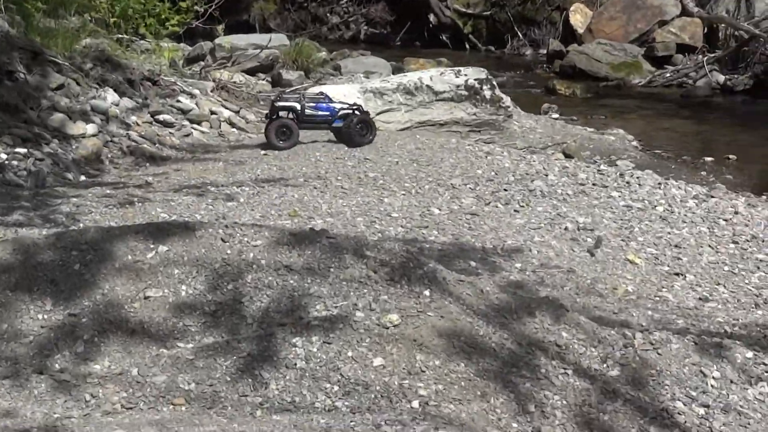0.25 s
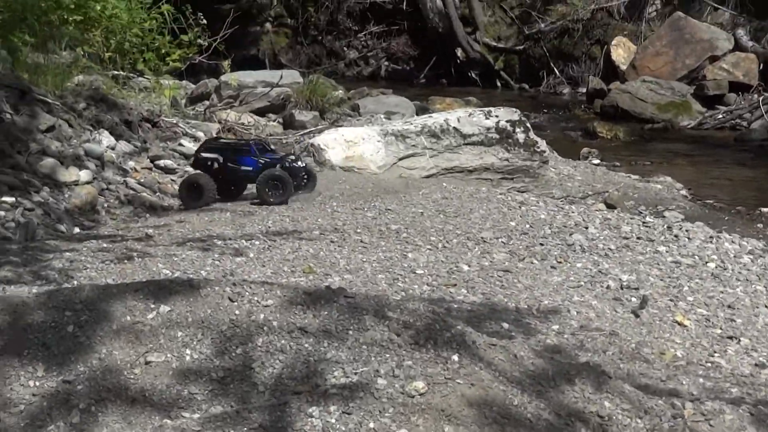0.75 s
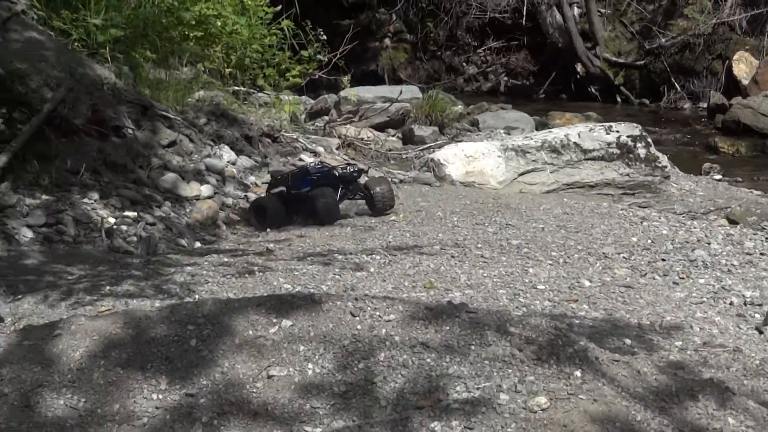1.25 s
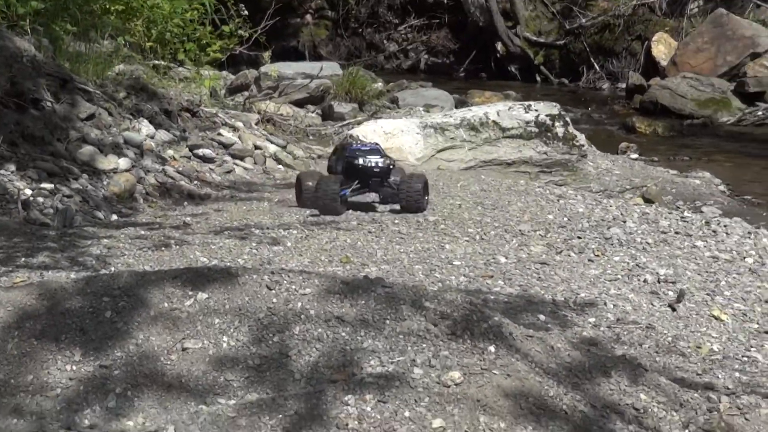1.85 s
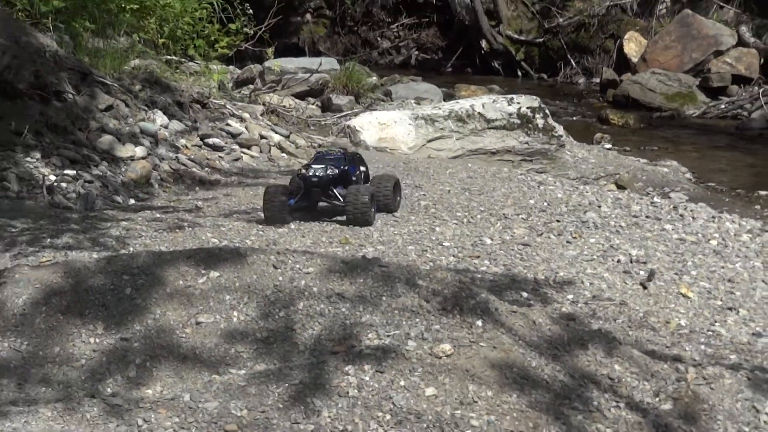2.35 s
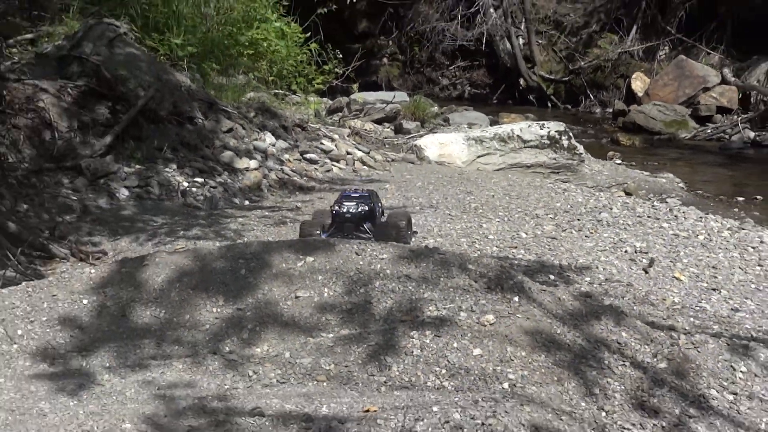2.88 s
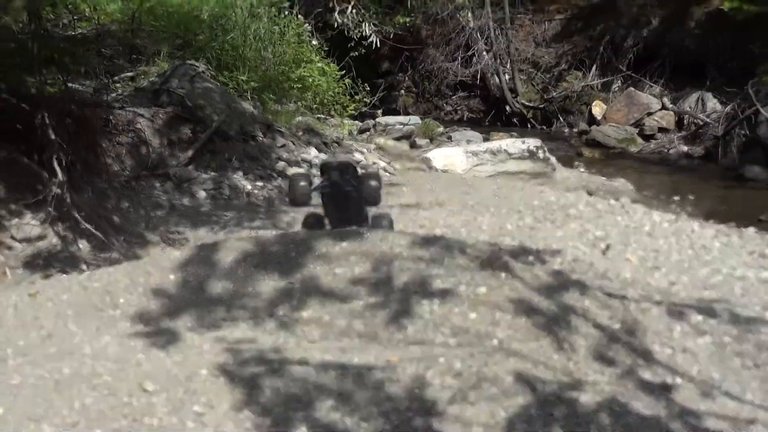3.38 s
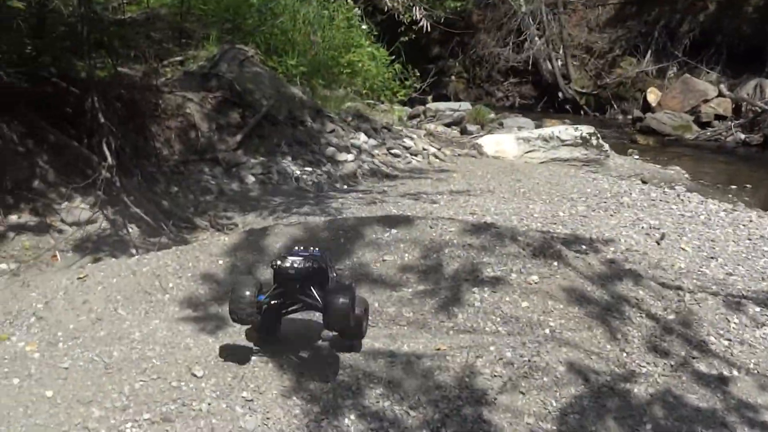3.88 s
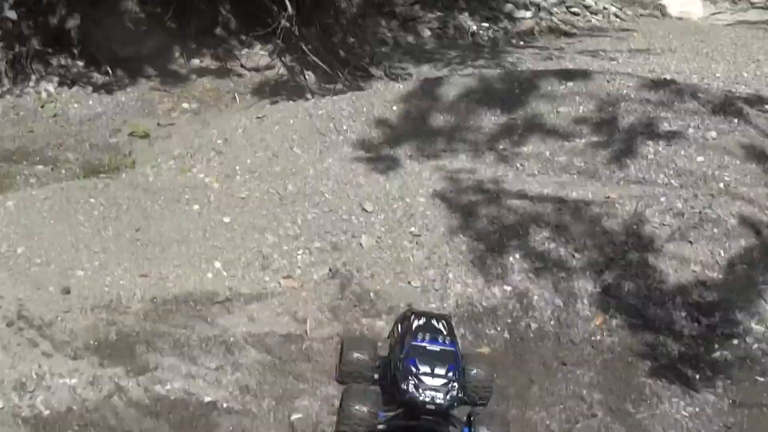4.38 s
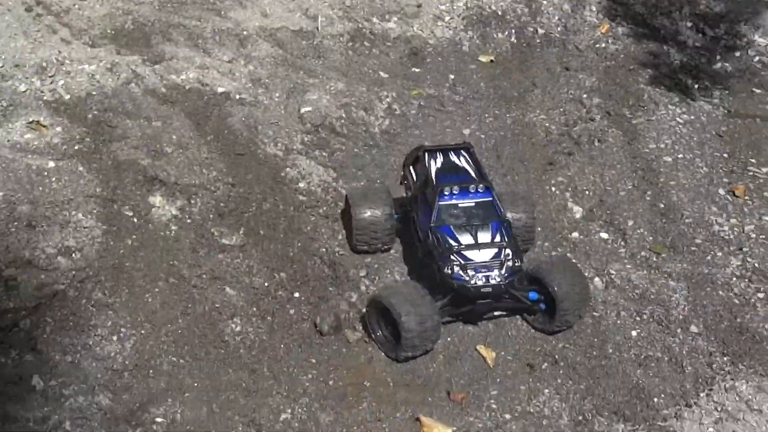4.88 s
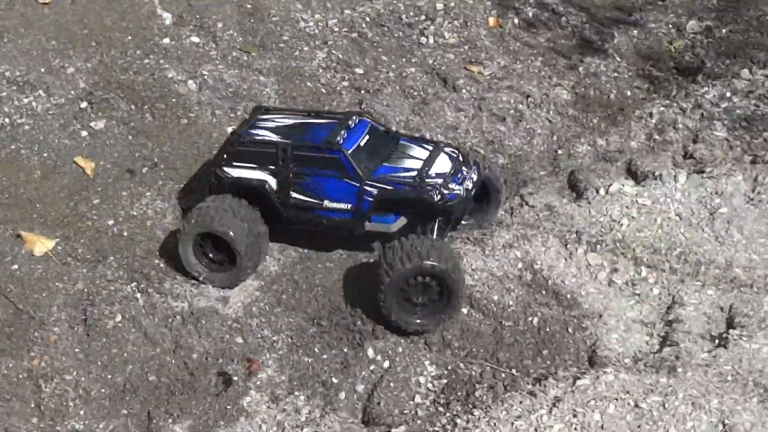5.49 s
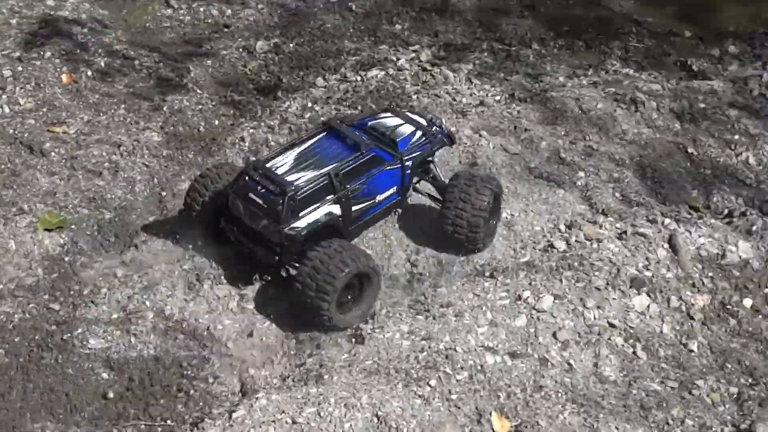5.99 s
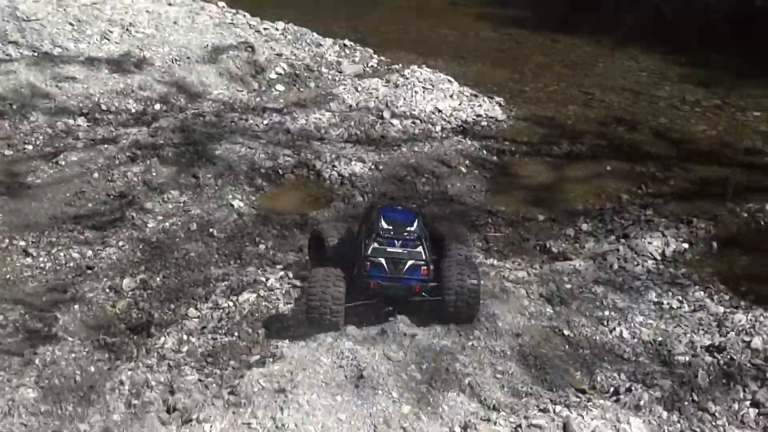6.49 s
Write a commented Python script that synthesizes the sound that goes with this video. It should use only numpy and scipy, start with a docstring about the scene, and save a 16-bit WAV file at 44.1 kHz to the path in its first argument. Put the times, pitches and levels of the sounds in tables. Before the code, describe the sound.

A creek ripples softly throughout on an open gravel bank. From 0 to 0.4 seconds a distant toy truck is barely heard, with a light thump. Around 0.45 to 0.7 its electric gear whine jumps up and stones scrub under spinning tyres; it drops back, then surges again at 1.2 to 1.5. From 1.9 to 3.2 it approaches with a rough, wavering whine, faint squeaks and light gravel crunch; a thin bird note sounds near 2.7. At 3.3 gears screech sharply, gravel bursts and a hollow thump follows at 3.45. During the jump low tyre rumble drops while small metal parts jingle. It lands around 3.97 to 4.2 with thumps and bright stone cracks. Close by, it whines and crunches, clattering at 5.05. From 5.2 bursts of howl and short screeches lead into a climbing, ragged whine over loud gravel, with a thin steady motor tone, until about 6.7.

```python
"""On a gravel bank by a creek, a radio-controlled truck crosses, jumps a mound, lands close by and speeds away.
Rough gears whine, howl and ring the drivetrain; the speed controller adds a thin, nearly steady tone.
Random contacts, coloured by tyres, gravel and plastic, make the crunch, rumble, clatter and flung stones.
Joints squeak and landings thump; the creek runs on and a bird calls faintly."""
import sys
import numpy as np
from scipy import signal
from scipy.fft import rfft, irfft, next_fast_len
from scipy.io import wavfile
from scipy.ndimage import uniform_filter1d, map_coordinates

SR = 44100
rng = np.random.default_rng(int(sys.argv[2]) if len(sys.argv) > 2 else 0)


def output_pcm(signal):
    """Save a mono or channel-first signal as 16-bit PCM at the path in sys.argv[1].

    Samples are clipped to [-1, 1] before scaling.
    """
    pcm = np.clip(np.atleast_2d(signal).T, -1, 1) * 32767
    wavfile.write(sys.argv[1], SR, np.round(pcm).astype(np.int16))


N = 297234


def amp(db):
    """Decibels to gain."""
    return 10 ** (np.asarray(db) / 20)


def unit(x):
    """x at rms 1."""
    return x / np.sqrt(np.mean(x ** 2) + 1e-20)


def curves(rows):
    """One value per sample for each column after the time."""
    s, *cols = np.transpose(rows)
    return [np.interp(np.arange(N) / SR, s, c) for c in cols]


def wobble(rate):
    """A smooth random curve of rms 1, rate knots a second."""
    knots = rng.standard_normal(int(N * rate / SR) + 4)
    return unit(map_coordinates(knots, [np.arange(N) * rate / SR]))


def turning(hz):
    """Phase of a changing frequency."""
    return 2 * np.pi * np.cumsum(hz) / SR


def filtered(x, response):
    """x times a complex response of frequency."""
    m = next_fast_len(N + SR // 2)
    return irfft(rfft(x, m) * response(np.fft.rfftfreq(m, 1 / SR)), m)[..., :N]


def coloured(x, points):
    """x through a spectrum of (Hz, dB) points."""
    f, db = np.transpose(points)
    return filtered(x, lambda hz: amp(np.interp(np.log(hz + 1), np.log(f), db)))


def resonant(x, modes):
    """x through (Hz, width Hz, dB) resonances."""
    def response(f):
        return sum(amp(db) * 1j * f * w / (c * c - f * f + 1j * f * w) for c, w, db in modes)
    return filtered(x, response)


def grains(rate, spread_db):
    """Tiny contacts at random moments; a positive spread makes a few much harder than the rest."""
    size = amp(spread_db * np.minimum(rng.standard_exponential(N), 4))
    return unit((rng.random(N) < rate / SR) * size * rng.standard_normal(N))


def pebbles(rate, low_hz, high_hz, cycles, spread_db):
    """Each flung pebble pings briefly at its own pitch."""
    count = int(rate * N / SR)
    when, pitch, hardness = rng.random((count, 3)).T[:, :, None]
    hz = low_hz + (high_hz - low_hz) * pitch
    k = np.arange(SR // 40)
    pings = amp(spread_db * hardness) * np.sin(2 * np.pi * hz * k / SR) * np.exp(-hz * k / SR / cycles)
    return unit(np.bincount(((when * N).astype(int) + k).ravel(), pings.ravel(), N)[:N])


def ring(blows, hz, width_hz, order=3):
    """A resonance with steep skirts, fixed or moving, at rms 1."""
    carrier = np.exp(1j * turning(hz * np.ones(N)))
    sos = signal.butter(order, width_hz / 2, fs=SR, output="sos")
    return unit((signal.sosfilt(sos, blows / carrier) * carrier).real)


def flutter(phase, shaft, depth):
    """A gear tone; an off-centre shaft and loose teeth split it into wandering side tones."""
    sides = sum(wobble(40) * np.sin(phase + k * shaft) / abs(k) for k in (-1.5, -0.5, 1.26, 6.5))
    return unit(np.sin(phase) + depth * sides)


def panels(x, t60):
    """The body's many close modes ring on after a tone; its slow level changes are evened out."""
    t = np.arange(SR // 12) / SR
    modes = rng.standard_normal(len(t)) * amp(-60 * t / t60)
    rung = signal.fftconvolve(x, modes)[:N]
    return rung / np.sqrt(np.abs(uniform_filter1d(rung ** 2, size=4000)) + 1e-9)


def add(track, s, sound):
    """Mix a sound into the track at time s."""
    part = track[max(round(s * SR), 0):][:len(sound)]
    part += sound[:len(part)]


def swell(s, length, rise_s, fall_s):
    """0 to 1 and back: rise from s, hold until s + length, fall."""
    t = np.arange(N) / SR - s
    return np.clip(np.minimum(t / rise_s, 1 - (t - length) / fall_s), 0, 1)


def swells(rows, rise_s, fall_s):
    """Events (s, length, amounts..) summed into one control for each amount."""
    return sum(np.outer(amounts, swell(s, length, rise_s, fall_s)) for s, length, *amounts in rows)


def air():
    """Faint moving air rumbles separately on each channel."""
    spectrum = [(25, -5), (60, -3), (150, -12), (600, -40)]
    return amp(-83) * unit(coloured(rng.standard_normal((2, N)), spectrum))


# Spectrum of the rippling water: pitch_hz, level_db (per Hz)
CREEK_SPECTRUM = [(40, -22), (130, -15), (250, -6.5), (400, 6), (1000, 8.5), (1500, 4.5), (3000, -5.5),
                  (5000, -7), (9500, -20), (16000, -33.5)]


def creek():
    """Shallow water ripples over stones: dense random contacts, a little different at each ear."""
    def water():
        return unit(coloured(grains(9000, spread_db=3.5), CREEK_SPECTRUM))
    sides = np.outer([1, -1], water())
    return amp(-48.0 + 1.9 * wobble(7.1)) * (water() + amp(-10.0) * sides)


# Bird notes: start_s, length_s, start_hz, end_hz, level_db
BIRD_NOTES = [(0.919, 0.15, 5670, 5900, -49), (2.688, 0.083, 6460, 4900, -38),
              (2.83, 0.078, 4860, 4576, -46)]


def bird():
    """Thin notes swell and fade while their pitch glides, fastest at the end."""
    song = np.zeros(N)
    for s, length, start_hz, end_hz, db in BIRD_NOTES:
        u = np.linspace(0, 1, round(length * SR))
        glide_hz = start_hz + (end_hz - start_hz) * u ** 3
        add(song, s, amp(db) * np.sin(np.pi * u) * np.sin(turning(glide_hz)))
    return song


def bank(x, t60):
    """The rocky bank scatters a short, dull answer to each side."""
    t = np.arange(SR // 3) / SR
    tail = rng.standard_normal((2, len(t))) * amp(-60 * t / t60) * (t > .008)
    wet = signal.fftconvolve(x[None], tail / np.linalg.norm(tail[0]), axes=1)[:, :N]
    return coloured(wet, [(100, 10), (600, 11.0), (1200, -7), (2500, 4), (4500, 7.5), (8000, -33), (12000, -34)])


# Throttle bursts; turning and climbing strain the axles: start_s, length_s, load_db, axle_strain_db
THROTTLE = [(.42, 0.38, 9, 0), (1.13, 0.37, 9.5, 4), (2.6, 0.47, 2.5, 2.5), (3.26, 0.15, 7, 8.5),
            (5.18, 0.28, 7, -1.5), (5.54, 0.64, 7, 0), (6.3, 0.42, 4, 1)]
THROTTLE_RISE_S, THROTTLE_FALL_S = 0.04, 0.14


def throttle():
    """Controls for motor load and axle strain, in dB."""
    return swells(THROTTLE, THROTTLE_RISE_S, THROTTLE_FALL_S)


# Base level of the drivetrain, set by its distance and effort: time_s, level_db
DRIVE_LEVEL = [(0, -67), (.4, -50), (.5, -46.5), (.66, -46.5), (.8, -65), (1.05, -54), (1.22, -44.5),
               (1.65, -51), (2.08, -42.5), (3.2, -45.5), (3.34, -35.5), (3.96, -31.5), (4.0, -34),
               (4.05, -30), (4.19, -32.5), (4.3, -35), (4.75, -34.5), (5.1, -27), (5.38, -33.5),
               (5.6, -29.5), (6.4, -30.5), (6.74, -34)]


def driven(part):
    """Level in dB of a part (dB when coasting, dB more per dB of load) that follows drive and throttle."""
    (drive_db,), (load_db, _) = curves(DRIVE_LEVEL), throttle()
    coast_db, per_load = part
    return drive_db + coast_db + per_load * load_db


# Brief jolts that lift or hush each part: start_s, length_s, gravel_db, axle_db, motor_db, tyre_db
BUMPS = [(1.125, 0.022, 7.5, 0, 2, 12), (1.23, 0.097, 0.5, 2, 4, 5), (3.335, 0.047, -5, 8.5, -6, -8),
         (3.385, 0.026, 0.5, -1, 6, -4), (3.45, 0.043, -1.5, 2.5, -5, 4.5), (3.59, 0.024, 5.5, 15, 4, 8),
         (3.75, 0.036, 3, 7.5, 0, 0), (3.95, .03, 1.5, 6, 3, 0), (4.03, 0.015, 4.5, 5, -4, 6),
         (4.058, 0.022, -8, -8, -17, 6), (4.09, 0.1103, 0.5, -2, -13, 9), (4.49, 0.03, 5.5, 14.5, 11, 4.5),
         (4.852, 0.022, 6.5, -9, 12, 7.5), (5.17, 0.029, 5, -17, 11.5, -2), (5.58, 0.024, 3, -13, 5, -7),
         (6.49, 0.031, -2, -11, -1, 5.5)]
BUMP_RISE_S, BUMP_FALL_S = .012, .014


def bumps():
    """Controls for gravel, axles, motor and tyres, in dB."""
    return swells(BUMPS, BUMP_RISE_S, BUMP_FALL_S)


def band_noise(t, low_hz, high_hz):
    """Noise of rms 1 in a band, as long as t."""
    sos = signal.butter(2, [low_hz, high_hz], "band", fs=SR, output="sos")
    return unit(signal.sosfilt(sos, rng.standard_normal(len(t))))


# Stones against the chassis: start_s, level_db, ring_hz
STONE_HITS = [(.671, -27, 4100), (1.335, -35, 4000), (1.883, -35, 4100), (4.036, -27, 4900),
              (4.047, -21, 3850), (4.098, -16, 4200), (4.126, -19, 3900), (4.182, -17, 4700),
              (4.193, -28, 4500), (4.334, -26, 4100)]


def stones():
    """Stones hit plastic: a bright crack, then a brief ring of narrow noise."""
    track, t = np.zeros(N), np.arange(SR // 5) / SR
    for s, db, hz in STONE_HITS:
        crack = band_noise(t, 1500, 13000) * amp(-60 * t / .008)
        plastic = .8 * band_noise(t, .92 * hz, 1.08 * hz) * amp(-60 * t / .045)
        add(track, s, amp(db) * (crack + plastic))
    return track


# Suspension and sprayed gravel on the chassis: start_s, level_db, length_s (before the fade)
CLATTER = [(0.433, -33, 0.026), (0.666, -41, .012), (0.718, -32.5, 0.014), (1.544, -35, 0.015),
           (3.326, -26.5, 0.022), (3.43, -27, 0.029), (3.585, -47, .03), (4.034, -47, 0.022),
           (4.492, -35, 0.021), (4.851, -29, 0.02), (5.044, -21, 0.025)]
# Resonances of the plastic chassis: pitch_hz, width_hz, level_db
PLASTIC = [(1380, 400, 14), (2500, 840, 8), (4100, 690, 23.5), (8200, 3700, 23)]


def clatter():
    """Bursts of small contacts ring the plastic chassis."""
    shake, t = np.zeros(N), np.arange(SR // 5) / SR
    for s, db, length in CLATTER:
        rise, fade = np.minimum(t / 0.009, 1), amp(-60 * np.maximum(t - length, 0) / 0.023)
        add(shake, s, amp(db) * rise * fade)
    return shake * unit(resonant(grains(4600, spread_db=1.5), PLASTIC))


# Tyres and chassis hit the ground: start_s, level_db, hollow_hz
THUMPS = [(.211, -33, 1066), (0.859, -32.5, 1092), (1.728, -40.5, 513), (2.238, -50, 403),
          (2.565, -37, 418.4), (3.351, -47.5, 90), (3.453, -17.5, 785), (3.455, -38, 282.8),
          (3.607, -51, 80), (3.971, -25.5, 953), (3.976, -37.5, 128.1), (3.978, -34, 296),
          (4.086, -41, 140), (4.088, -25, 1079), (4.122, -37, 300), (4.166, -36, 221.4), (4.182, -26, 335),
          (6.489, -30, 835)]


def thumps():
    """A hollow note and a band of noise, mostly below it, swell fast and die away together."""
    track, t = np.zeros(N), np.arange(SR // 5) / SR
    fade = amp(-60 * t / .08) * (1 - np.exp(-t / .003)) ** 2
    for s, db, hz in THUMPS:
        body = .8 * np.sin(2 * np.pi * hz * t) + .6 * band_noise(t, hz / 2, hz * 1.2)
        add(track, s, amp(db) * body * fade)
    return track


# Spinning tyres scrub the gravel aside: start_s, length_s, level_db
WHEELSPIN = [(.45, .24, -37.5), (1.2, .27, -49)]
# Spectrum of the scrubbed stones: pitch_hz, level_db (per Hz)
SCRUB_SPECTRUM = [(400, -16), (700, -10), (900, 1), (1400, 0), (2000, -9), (3000, -2), (4100, 3),
                  (5200, -22)]


def wheelspin():
    """Coarse stones grind and clack under the slipping tread."""
    level = sum(amp(db) * swell(s, length, rise_s=0.05, fall_s=0.043) for s, length, db in WHEELSPIN)
    grind = grains(2500, spread_db=2)
    clacks = pebbles(300, low_hz=750, high_hz=4300, cycles=9, spread_db=14)
    return level * unit(coloured(grind + clacks, SCRUB_SPECTRUM))


# Base level of the gravel under the wheels: time_s, level_db
GROUND_LEVEL = [(0, -37.5), (.15, -47), (.4, -43), (.65, -30), (.82, -39.5), (1.09, -43.5), (1.3, -33),
                (1.65, -41.5), (2.4, -39), (3.22, -42), (3.37, -20), (3.52, -30), (4.2, -27.5),
                (4.42, -35.5), (4.7, -30.5), (5.5, -30.5), (5.88, -26.5), (6.74, -31.5)]
# Spectra of crunching gravel and hollow tyres: pitch_hz, level_db (per Hz)
GRAVEL_SPECTRUM = [(120, -56), (300, -28), (600, -7), (950, -1), (2000, 2), (2700, 4.5), (4200, 3),
                   (4800, 0.5), (5900, 0.5), (7600, -0.5), (9600, 2.5), (11000, 2.5), (13300, -4),
                   (14500, -5), (16000, -2)]
RUBBER_SPECTRUM = [(25, -34), (65, -26), (100, -21.5), (160, -9.5), (300, 0), (420, 2), (650, -7.5),
                   (1100, -9), (2500, -51)]
# Resonances of the small steel parts: pitch_hz, width_hz, level_db
METAL = [(6870, 240, 0.5), (7620, 170, 6.5), (8500, 420, 0), (9420, 120, 7), (11920, 220, 4.5),
         (13070, 220, 4)]
RUMBLE = (-16.5, 0.6)  # dB when coasting, dB more per dB of load
# the jump: take-off and time aloft; the rumble drops and the steel parts ring harder
JUMP_S, AIR_S, AIR_RUMBLE_DB, AIR_JINGLE_DB = 3.5, 0.457, -17, 6


def wheels(jolt):
    """Hollow tyres rumble, gravel crunches and pings, and steel parts jingle with the shaking."""
    gravel_db, = curves(GROUND_LEVEL)
    shake_db, _, _, tyre_db = bumps()
    airborne = swell(JUMP_S, AIR_S, rise_s=0.083, fall_s=0.038)
    rumble_db = driven(RUMBLE) + tyre_db + AIR_RUMBLE_DB * airborne
    rumble = amp(rumble_db) * unit(coloured(grains(2000, spread_db=0.5), RUBBER_SPECTRUM))
    crunch = unit(coloured(grains(18000, spread_db=1.3), GRAVEL_SPECTRUM))
    pings = pebbles(1400, low_hz=7000, high_hz=15800, cycles=55, spread_db=20)
    clacks = pebbles(450, low_hz=850, high_hz=4500, cycles=11, spread_db=18)
    clacks = unit(coloured(clacks, GRAVEL_SPECTRUM))
    gravel = amp(-2) * crunch + amp(-8) * pings + amp(-8) * clacks
    # each steel part jingles in its own bursts
    taps = grains(6000, spread_db=1.2)
    jingle = unit(sum(resonant(taps, [mode]) * amp(3 * wobble(45)) for mode in METAL))
    shaken = amp(gravel_db + shake_db + 1.1 * jolt)
    return rumble + shaken * (gravel + amp(-7.5 + AIR_JINGLE_DB * airborne) * jingle)


# Dry joints squeak: start_s, length_s, level_db
SQUEAKS = [(1.862, 0.865, -47), (3.324, 0.153, -30)]


def squeaks():
    """Dry joints give thin, high tones that skid in pitch and break into short chirps."""
    level = sum(amp(db) * swell(s, length, rise_s=0.026, fall_s=.02) for s, length, db in SQUEAKS)

    def joint():
        skid_hz = 8600 + 600 * wobble(45) + 170 * wobble(600)
        return np.sin(turning(skid_hz)) * amp(6 * np.minimum(wobble(80), 1.3))
    return level * unit(joint() + joint())


# The speed controller sings: start_s, length_s, level_db
SINGING = [(0.54, 0.11, -44.5), (1.811, .7, -57), (4.877, 1.86, -48.5)]


def controller():
    """Chopped current makes the motor windings sing at nearly one pitch."""
    level = sum(amp(db) * swell(s, length, rise_s=0.035, fall_s=0.048) for s, length, db in SINGING)
    return level * amp(2.7 * wobble(25)) * unit(np.sin(turning(5905 + 24 * wobble(120))))


# Gear howls: start_s, length_s, pitch_hz, level_db, roughness (0-1, clipped)
HOWLS = [(0.518, .14, 4044, -41, 0.9), (1.24, 0.24, 2400, -43, .4), (1.301, 0.14, 3600, -41.5, .8),
         (1.88, 0.21, 3069, -40.5, 0.8), (2.03, 0.49, 3340, -45.5, .55), (2.66, 0.27, 3340, -42, 0.14),
         (2.566, 0.72, 2493, -48.5, .15), (3.27, 0.18, 3125, -27.5, .4), (5.06, 0.08, 1314, -27.5, .1),
         (5.28, .12, 3630, -27, 0.66), (5.558, 0.076, 3522, -24, 1.1), (5.75, 0.056, 3652, -22, .5),
         (5.86, 0.41, 3683, -31.5, 0.81), (5.937, 0.16, 2280, -26, .9), (6.3, 0.12, 1336, -31.5, 0.1)]


def howls():
    """A gear catches a resonance and holds near its pitch, from nearly clean to broken and rough."""
    t, mean_hz = np.arange(N) / SR, np.mean(HOWLS, axis=0)[2]
    phase = turning(mean_hz * (1 + .028 * wobble(60) + .024 * wobble(300)))
    ragged = panels(flutter(phase, phase / 30, depth=.4), t60=.02)
    ragged = signal.hilbert(ragged, next_fast_len(N))[:N]
    steady = np.sqrt(2) * unit(amp(3 * wobble(45))) * np.exp(1j * turning(mean_hz + 22 * wobble(70)))
    track = np.zeros(N)
    for s, length, hz, db, rough in HOWLS:
        share, level = np.clip(rough, 0, 1), swell(s, length, rise_s=0.02, fall_s=0.064)
        on = level > 0
        tone = np.sqrt(share) * ragged[on] + np.sqrt(1 - share) * steady[on]
        # move the tone from the mean pitch to its own
        shift = np.exp(2j * np.pi * (hz - mean_hz) * t[on])
        track[on] += amp(db) * level[on] * (tone * shift).real
    return track


# Brief gear screeches as the tyres bite: start_s, length_s, start_hz, end_hz, level_db
SCREECHES = [(3.274, 0.022, 3100, 3210, -27), (3.31, .018, 3150, 3200, -22),
             (3.34, 0.012, 2690, 2386, -10.5), (3.357, 0.0188, 2710, 2460, -14),
             (5.576, .012, 3520, 3200, -15), (5.683, .012, 3280, 3130, -12.5)]


def screeches():
    """Short, hard gear tones that slide in pitch."""
    track = np.zeros(N)
    for s, length, start_hz, end_hz, db in SCREECHES:
        u = np.linspace(0, 1, round(length * SR))
        slide_hz = start_hz + (end_hz - start_hz) * u
        add(track, s, amp(db) * np.sin(np.pi * u ** 2) * np.sin(turning(slide_hz)))
    return track


HIGH_RASP, LOW_RASP = (-10, 0.39), (-6, 0.46)  # dB when coasting, dB more per dB of load


def gear_rasp():
    """Slack in the gears adds two broad bands of random contacts."""
    high = amp(driven(HIGH_RASP)) * ring(grains(3000, spread_db=2.0), 3660, width_hz=1200)
    low = amp(driven(LOW_RASP)) * ring(grains(2500, spread_db=-1.5), 1795, width_hz=1080)
    return high + low


# The tooth rate picks the gear case's ringing mode: tooth_rate_hz, level_db, ring_hz
CASE_TUNING = [(1300, -1.5, 1357), (1410, 1, 1384), (1494, -0.5, 1446), (1690, -1, 1526), (2200, -4, 1370),
               (2510, -2, 1382)]
# dB when coasting, dB more per dB of load
CASE, SHELL, AXLE, CAN, MOUNT = (-0.38, -0.12), (-18, 0.34), (-7, 0.34), (-1.85, 0.054), (-6, 1)


def struck_parts(mesh_hz, phase, shake_db, axle_db, motor_db):
    """Each tooth strikes an uneven blow that rings the case, the shell, the axles and the motor."""
    teeth = np.diff(np.floor(phase / (2 * np.pi)), prepend=0)
    blows = unit(teeth * rng.standard_normal(N) / np.sqrt(mesh_hz))

    def part(hz, width_hz):
        """One part, chattering in its own bursts."""
        return unit(ring(blows, hz, width_hz) * amp(2.6 * wobble(50)))
    rate_hz, *columns = np.transpose(CASE_TUNING)
    case_db, case_hz = (np.interp(mesh_hz, rate_hz, column) for column in columns)
    _, strain_db = throttle()
    case = amp(driven(CASE) + case_db) * part(case_hz, 300)
    shell = amp(driven(SHELL)) * part(519, 158)
    axle = amp(driven(AXLE) + axle_db + strain_db) * part(2442, 200)
    can = amp(driven(CAN) + motor_db) * part(3057, 364)
    mount = amp(driven(MOUNT) + 0.26 * shake_db) * part(3580, 530)
    return case + shell + axle + can + mount


# How strongly the drivetrain radiates a gear tone: pitch_hz, level_db
RESPONSE = [(1215, 1), (1300, -2), (1480, -3), (1680, -4.5), (1900, 2), (2100, -2), (2440, -4), (2560, -30),
            (2850, -14), (3000, -8), (3230, 2), (3420, -1), (3620, 3), (3900, -2), (4500, -34)]
MESH, OCTAVE, OVERTONES = (0, 0.28), (-1.1, 0.89), (-17, .2)  # dB when coasting, dB more per dB of load
SPEED_GAIN_DB = 5.5  # per doubling of the tooth rate, for the mesh tone and octave


def gear_whine(mesh_hz, hunt, phase):
    """The mesh tone and its octave flare through resonances; overtones sweep across the steel parts."""
    def radiated_db(hz):
        return np.interp(hz, *np.transpose(RESPONSE))
    shaft = phase / 14
    octave_hz = 2 * mesh_hz * (1 + hunt)
    mesh = panels(flutter(phase, shaft, depth=.45), t60=.03)
    octave = panels(flutter(turning(octave_hz), shaft, depth=.6), t60=.018)
    whine = amp(driven(MESH) + radiated_db(mesh_hz)) * mesh
    whine += amp(driven(OCTAVE) + radiated_db(octave_hz)) * octave
    whine *= amp(SPEED_GAIN_DB * np.log2(mesh_hz / mesh_hz.mean()))
    overtones = sum(flutter(k * phase, shaft, depth=0.84) for k in range(4, 10))
    steel = unit(resonant(overtones, METAL))
    return whine + amp(driven(OVERTONES) + radiated_db(mesh_hz)) * steel


# Mean gear mesh speed: time_s, tooth_rate_hz
GEAR_SPEED = [(0, 1389), (.41, 1400), (.47, 2072), (.68, 2046), (.8, 1400), (1.12, 1419), (1.2, 2400),
              (1.45, 2418), (1.58, 1476), (1.85, 1366), (2, 1490), (2.2, 1476), (2.48, 1431), (2.6, 1542),
              (2.87, 1663), (3.15, 1599), (3.3, 1565), (3.44, 1558), (3.52, 1370), (3.85, 1403),
              (4.3, 1286), (5, 1283), (5.5, 1326), (5.62, 1591), (5.71, 1602), (5.79, 1849), (5.9, 1990),
              (5.98, 2233), (6.15, 2340), (6.3, 2451), (6.74, 2495)]
HUNT, HUNT_PER_LOAD_DB = .7, .1  # depth of the pitch wander, and more per dB of load


def drivetrain(jolt):
    """Teeth mesh at a rate that wanders, more so under load; the gears whine, ring the parts and rasp."""
    mesh_hz, = curves(GEAR_SPEED)
    shake_db, axle_db, motor_db, _ = bumps()
    load_db, _ = throttle()
    hunt = (HUNT + HUNT_PER_LOAD_DB * load_db) * (.023 * wobble(48) + .018 * wobble(300))
    phase = turning(mesh_hz * (1 + hunt))
    whine = gear_whine(mesh_hz, hunt, phase)
    parts = struck_parts(mesh_hz, phase, shake_db, axle_db, motor_db)
    rasp = amp(1.47 * shake_db) * gear_rasp()
    return amp(.5 * jolt) * (whine + parts + rasp)


def scene():
    """The truck stays straight ahead; one random jolt shakes its drivetrain and wheels together."""
    jolt = unit(wobble(30) + wobble(70))
    ground = stones() + clatter() + thumps() + wheelspin() + wheels(jolt)
    machine = squeaks() + controller() + howls() + screeches() + drivetrain(jolt)
    direct = bird() + ground + machine
    return air() + creek() + amp(-29.5) * bank(direct, t60=0.063) + direct


TOP_HZ = 16000


def record(dry):
    """The microphone thins the deep bass and keeps nothing above its band limit."""
    thin = coloured(dry, [(25, -10), (55, -12), (80, -7), (120, 0), (300, 0)])
    return filtered(thin, lambda hz: hz < TOP_HZ)


dry = scene()
out = record(dry)
output_pcm(out)
```